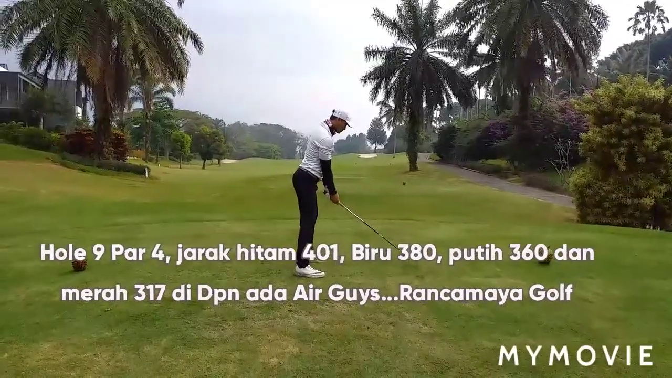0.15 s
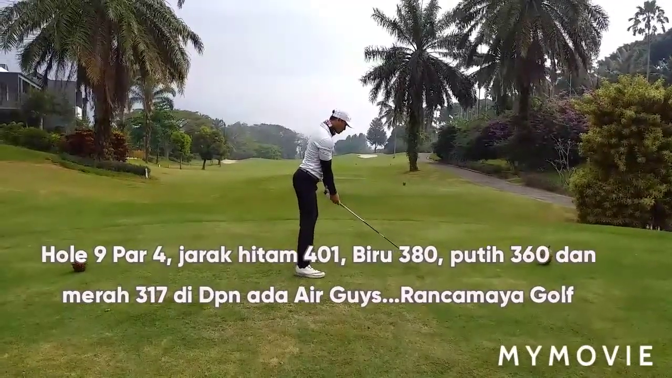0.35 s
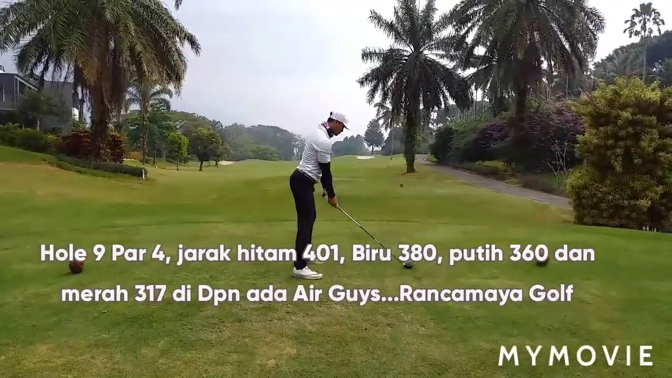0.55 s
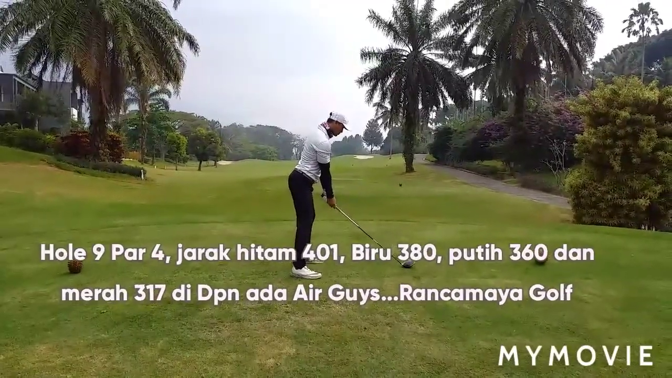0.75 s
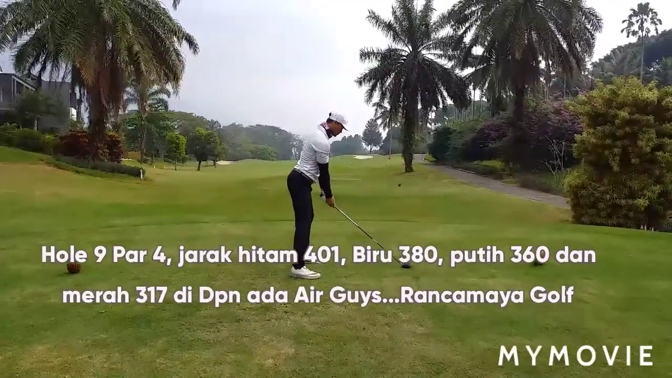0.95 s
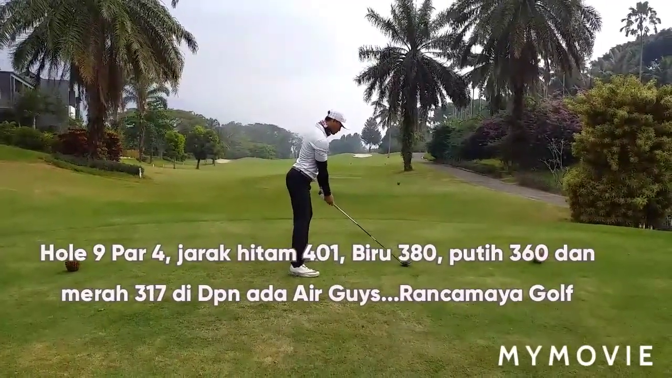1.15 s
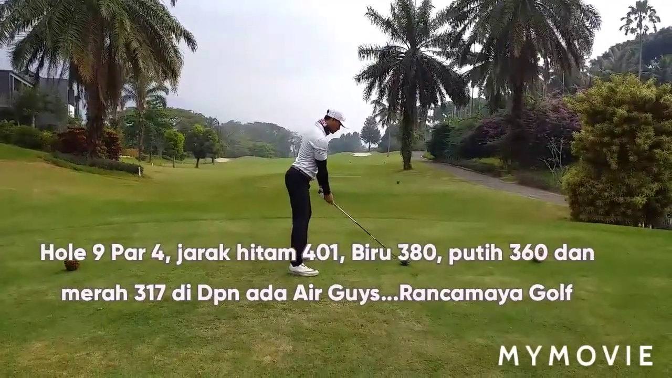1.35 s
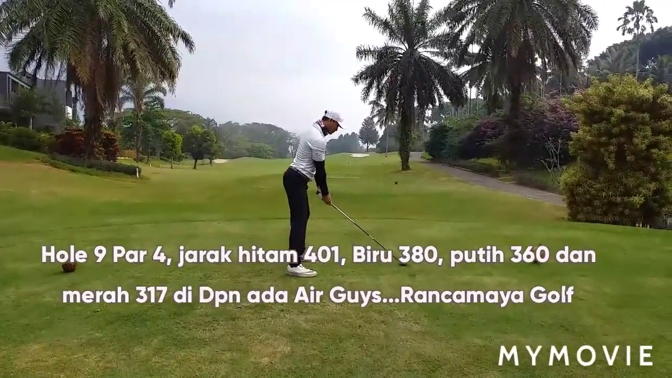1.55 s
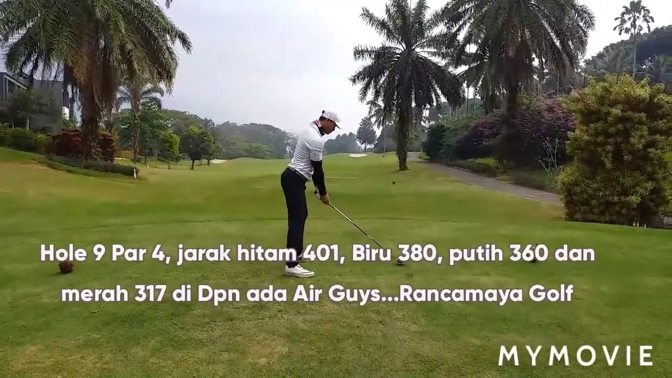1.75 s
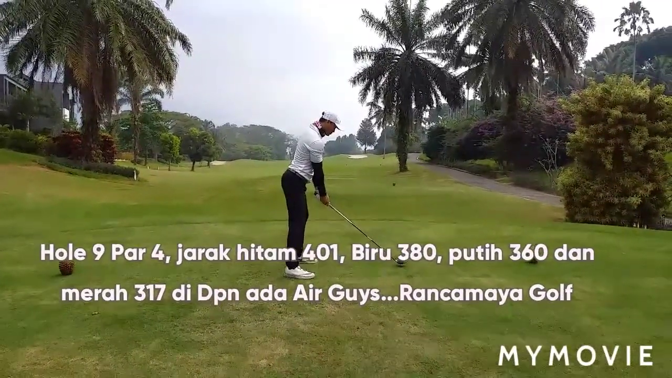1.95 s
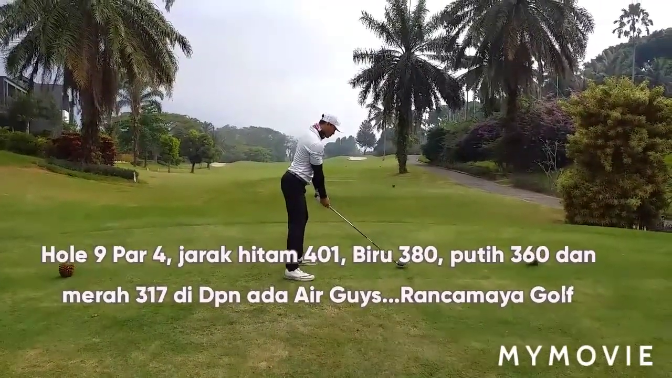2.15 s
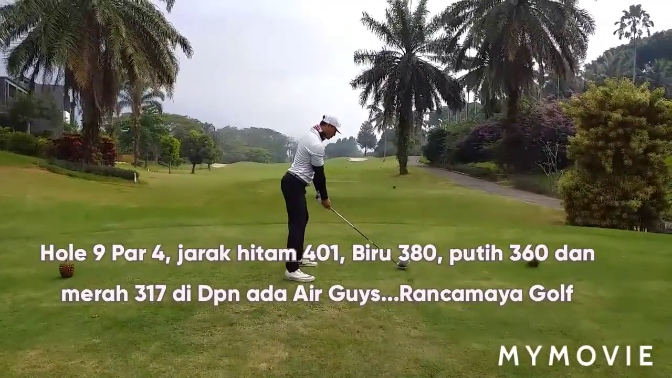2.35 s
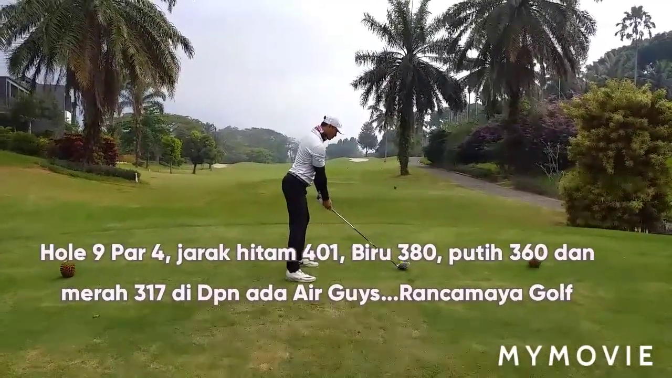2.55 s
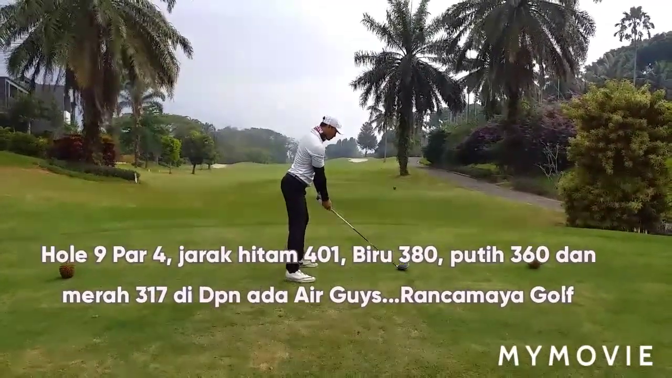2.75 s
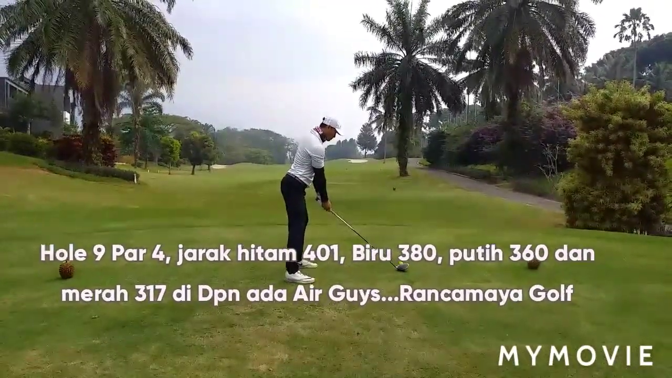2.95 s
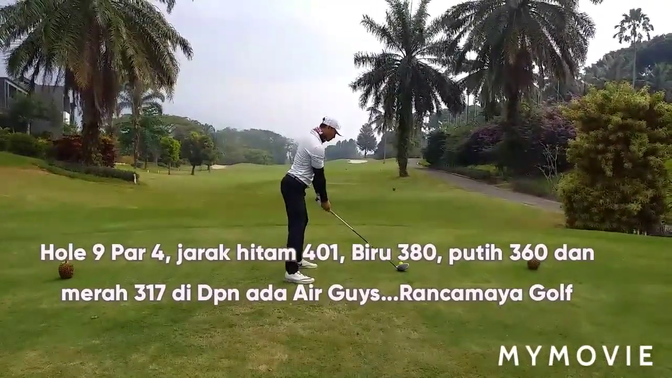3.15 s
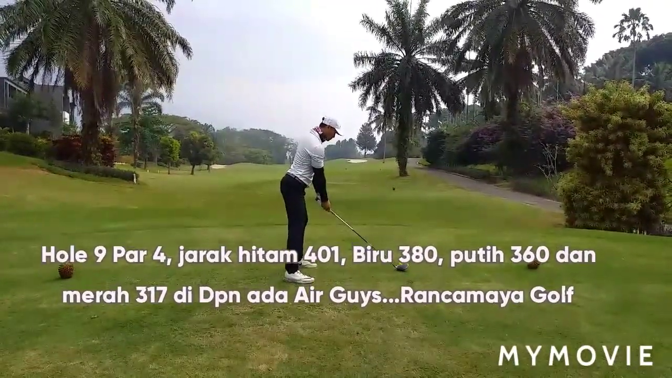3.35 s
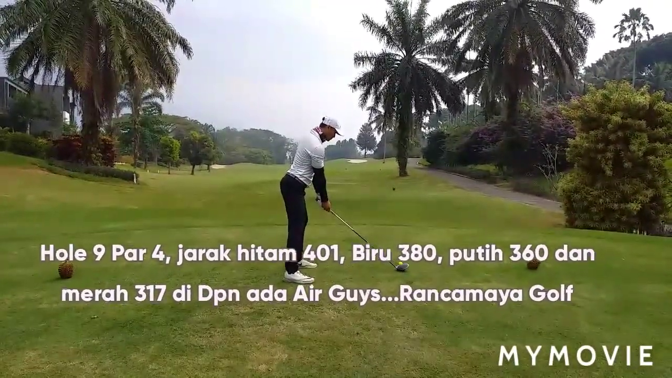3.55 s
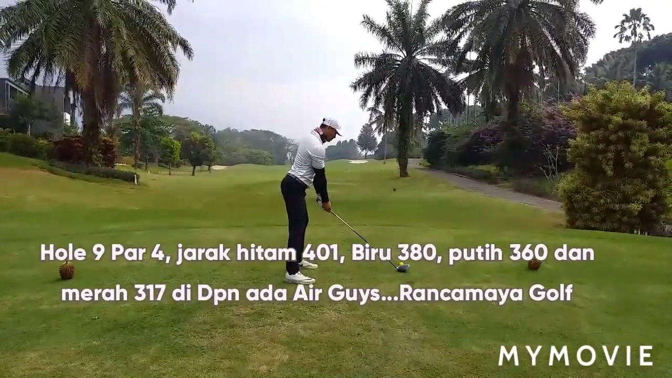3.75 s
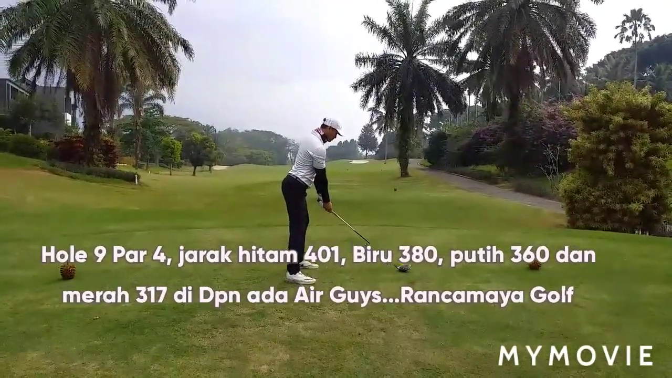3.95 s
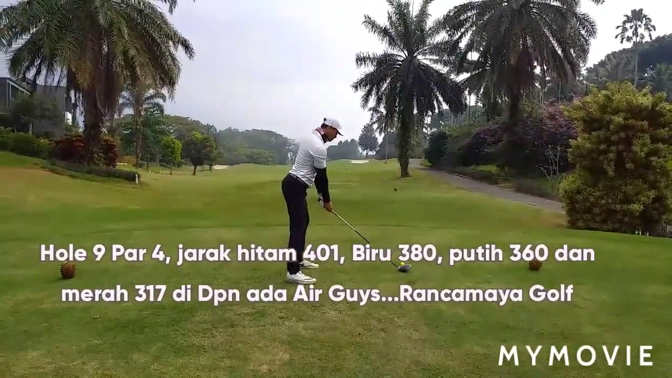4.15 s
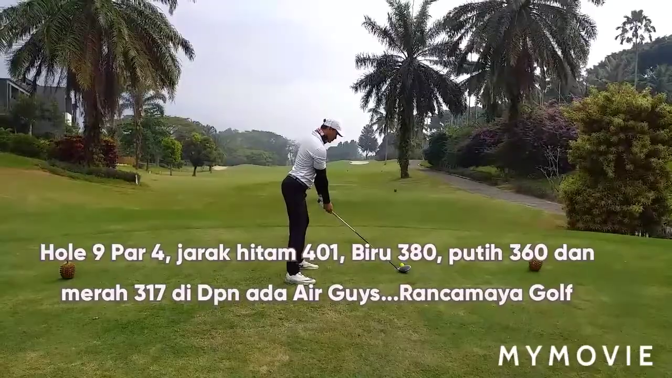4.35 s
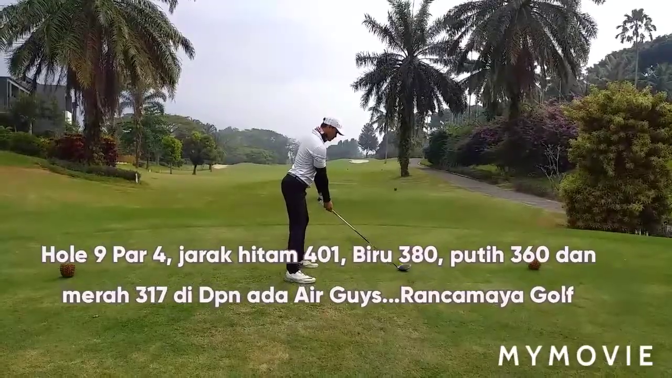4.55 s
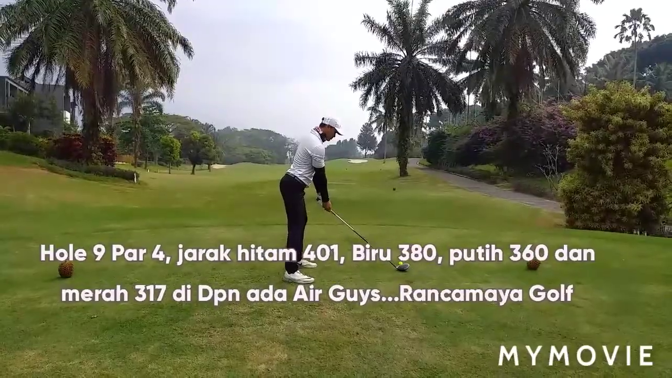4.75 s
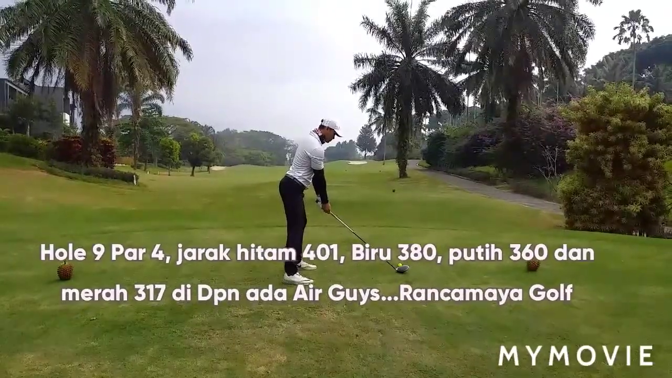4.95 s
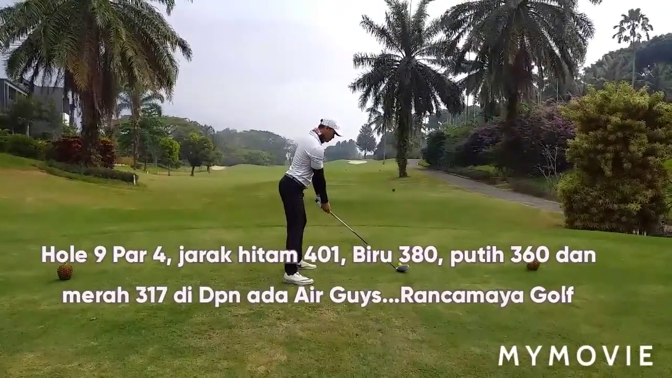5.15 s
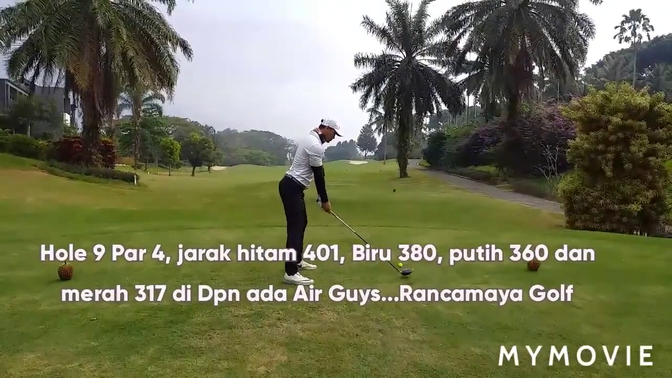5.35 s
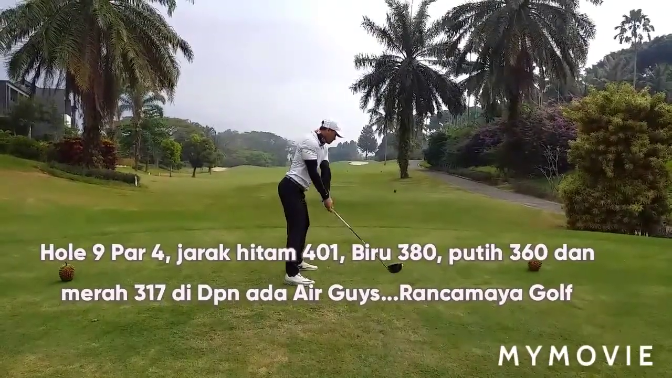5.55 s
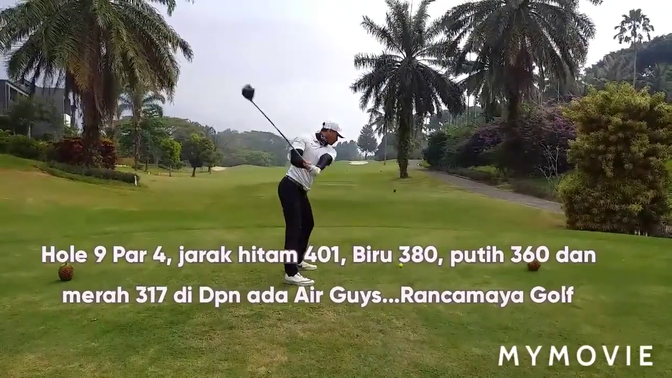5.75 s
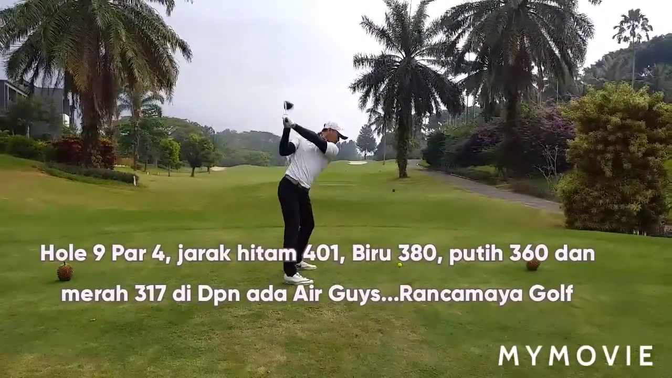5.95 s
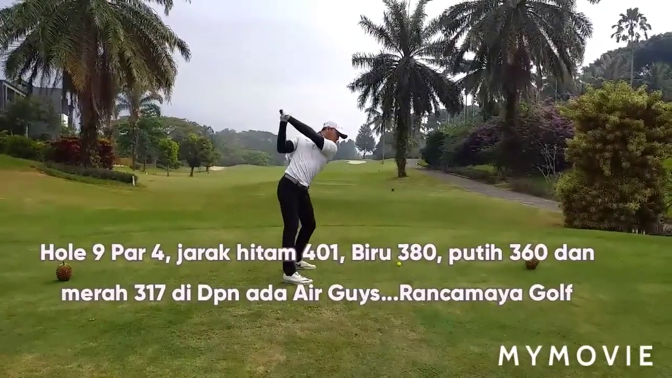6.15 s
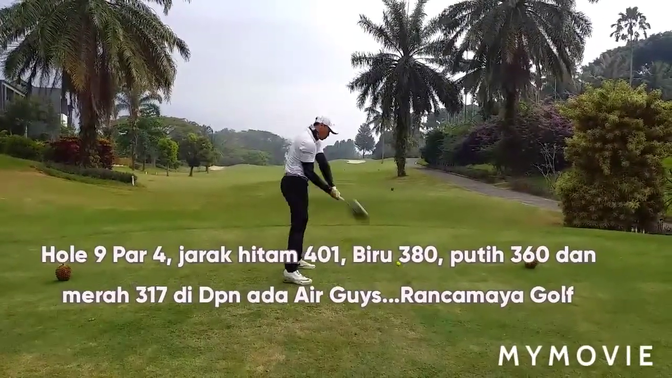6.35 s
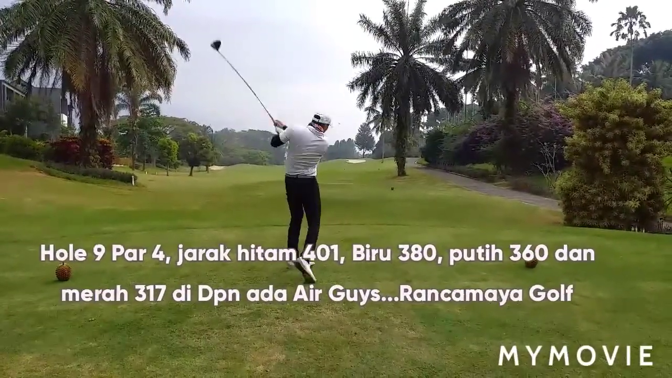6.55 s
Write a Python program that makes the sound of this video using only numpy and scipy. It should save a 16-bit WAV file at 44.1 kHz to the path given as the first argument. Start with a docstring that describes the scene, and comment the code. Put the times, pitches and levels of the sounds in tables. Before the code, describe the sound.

From 0 s a very quiet open golf course is heard in mono: soft low rumble, far traffic, leafy hiss and a shimmering insect chorus, with a bush cricket buzzing continuously very high. A distant engine throbs faintly, bogging down around 2.7-3.8 s, recovering with a slight drone near 4.8 s, then slowing again. A small bird gives a thin whistle at 0.8 s, more from 2.3 s onward, with short rising chips at 3.3 and 3.5 s; a farther bird lisps softly around 2.1-2.6 s. Tiny dry ticks cluster at 2.74 s, with fainter ones at 3.6 and 3.7 s. Whistles continue until about 6.1 s. Just before 6.4 s the club swishes briefly, then at 6.44 s a very loud, hard metallic crack bursts out, with hollow high ringing, a small low thud and quick splashing echoes from palms, cut off soon after at the end.

```python
"""A hard metallic crack rings out and splashes back from palms, on a quiet golf tee where a distant engine
drones, a bush cricket buzzes, small birds whistle and a few faint ticks sound.
Shaped noise makes the air, leaves, swish and crack; decaying sines make the hollow club head; noise in
resonances makes its echoes; harmonics of a firing rate make the engine; gliding sines make cricket and birds."""
import sys
import numpy as np
from scipy import signal
from scipy.fft import rfft, irfft, next_fast_len
from scipy.io import wavfile
from scipy.ndimage import map_coordinates

SR = 44100
rng = np.random.default_rng(int(sys.argv[2]) if len(sys.argv) > 2 else 0)


def dump(signal):
    """Clip the signal to [-1, 1] and save it as 16-bit WAV at the path in sys.argv[1]."""
    limited = np.clip(np.atleast_2d(signal).T, -1, 1)
    pcm = np.round(limited * 32767).astype(np.int16)
    wavfile.write(sys.argv[1], SR, pcm)


N = 290988
IMPACT = 6.4382  # s, when the club head meets the ball


def amp(db):
    """Logarithmic level: decibels to gain."""
    return 10 ** (np.asarray(db) / 20)


def unit(x):
    """Normalisation: scale to rms 1."""
    return x / np.sqrt(np.mean(x ** 2) + 1e-20)


def clock():
    """Sampling: the time of every sample in seconds."""
    return np.arange(N) / SR


def curves(rows):
    """Linear interpolation: one value per sample for each column after the time."""
    seconds, *columns = np.transpose(rows)
    return [np.interp(clock(), seconds, column) for column in columns]


def wobble(rate):
    """Slow random modulation: a smooth curve through random knots, rate of them a second."""
    knots = rng.standard_normal(int(N * rate / SR) + 4)
    return map_coordinates(knots, [clock() * rate])


def filtered(x, response):
    """Linear filtering: the spectrum of x times a response of frequency."""
    m = next_fast_len(N + SR // 2)
    return irfft(rfft(x, m) * response(np.fft.rfftfreq(m, 1 / SR)), m)[:N]


def noise(spectrum):
    """Spectral shaping: noise of rms 1 coloured by (Hz, relative dB per Hz) points."""
    f, db = np.transpose(spectrum)

    def colour(hz):
        return amp(np.interp(np.log(hz + 1), np.log(f), db))

    return unit(filtered(rng.standard_normal(N), colour))


def resonant(peaks):
    """Forced resonance: noise of rms 1 ringing in (Hz, width Hz, relative dB) resonators."""
    lowest, highest = peaks[0][0], peaks[-1][0]

    def response(f):
        body = sum(amp(db) * 1j * f * w / (c * c - f * f + 1j * f * w) for c, w, db in peaks)
        # steep skirts keep the sound between the outer resonances
        low_skirt = 1 + (.8 * lowest / (f + 1)) ** 12
        high_skirt = 1 + (f / highest / 1.3) ** 12
        return body / low_skirt / high_skirt

    return unit(filtered(rng.standard_normal(N), response))


def fade(start, t60, attack):
    """Exponential decay: a quick rise at start, then a fall of 60 dB in t60 seconds."""
    t = np.maximum(clock() - start, 0)
    return (1 - np.exp(-t / attack)) * np.exp(-np.log(1000) * t / t60)


# Spectra of the steady noises. Each row: frequency in Hz, relative level in dB per Hz.
RUMBLE_SPECTRUM = [(25, -39), (42, -12), (65, -3.5), (80, 0.5), (130, 0), (230, -8), (400, -16.5),
                   (900, -64)]
TRAFFIC_SPECTRUM = [(100, -28), (300, 1.5), (500, 0.5), (660, 2), (800, -2), (1150, -3), (1400, -4),
                    (1800, -10), (3000, -20.5), (8000, -52)]
LEAVES_SPECTRUM = [(900, -11), (1900, 2.5), (2500, 4.5), (3100, 5), (3800, 6.5), (5400, 2), (6200, -1.5),
                   (7600, -2.5), (8600, -13.5), (11400, -12.5), (11800, -34), (16000, -23)]
CHORUS_SPECTRUM = [(3000, -36), (4000, -14), (4400, -3), (4750, -1.5), (5200, -8), (6000, -25), (9000, -62)]
# Slow course of far traffic and insect chorus. Each row: time in seconds, level in dB before trims.
TRAFFIC_COURSE = [(0.0, -66), (0.19, -61.5), (0.47, -64.5), (2.56, -60.5), (2.6, -65), (3.03, -64.5),
                  (3.49, -70.5), (3.67, -61.5), (3.72, -67.5), (4.7, -61), (5.51, -68), (6.3, -71.5)]
CHORUS_COURSE = [(0.05, -64.5), (1.72, -60.5), (2.47, -60.5), (2.87, -66), (3.97, -70.5), (4.44, -68),
                 (4.72, -65.5), (4.87, -65), (5.26, -72.5), (5.73, -74.5), (6.3, -71.5)]


def background(leaves_db=-63, leaves_follow=0.47):
    """Incoherent addition: rumble, far traffic, leaves, insect chorus and microphone hiss are separate noises."""
    traffic_db, chorus_db = curves(TRAFFIC_COURSE)[0], curves(CHORUS_COURSE)[0]
    chorus_swing = chorus_db - chorus_db.mean()
    rumble = amp(-58.5 + 1.53 * wobble(7.4)) * noise(RUMBLE_SPECTRUM)
    traffic = amp(traffic_db + 3.5 + 0.69 * wobble(6.1)) * noise(TRAFFIC_SPECTRUM)
    # the leaves swell and sink with the chorus, in dB per dB
    leaves = amp(leaves_db + leaves_follow * chorus_swing + 0.99 * wobble(6.6)) * noise(LEAVES_SPECTRUM)
    chorus = amp(chorus_db + 0.31 * chorus_swing + 0.77 * wobble(30)) * noise(CHORUS_SPECTRUM)
    hiss = amp(-78.0) * rng.standard_normal(N)
    return rumble + traffic + leaves + chorus + hiss


# Course of the distant engine, slowing when loaded. Each row: time in seconds, firing rate in Hz,
# load from 0 to 1, throb level in dB added to its orders, drone level in dB added to its orders.
ENGINE_COURSE = [(0, 44.07, 0.05, -6.5, -86), (1.6, 44.1, 0.04, 2, -75), (2.63, 43.53, 0.05, 1, -76),
                 (2.7, 41.5, 0.88, 1, -84), (3.1, 35.9, 1, 0.5, -74.5), (3.84, 31.75, .75, 1, -74),
                 (4.3, 38.28, 0.7, -2, -64), (4.85, 41.42, .25, 2.5, -60.5), (5.2, 40.1, 0.54, -1, -63),
                 (5.56, 33.84, 0.71, 0.5, -71), (6.3, 30.86, 0.52, -2.5, -88)]
# Orders of the low throb. Each row: multiple of the firing rate, level in dB running free,
# change in dB at full load.
THROB_ORDERS = [(2, -60.5, -6.5), (3, -72.5, 15), (4, -67, 12), (5, -75.5, 12), (6, -83.5, 14)]
# Orders of the upper drone. Each row: multiple of the firing rate, relative level in dB.
DRONE_ORDERS = [(8, -4.5), (9, -8), (10, -1.5)]
# Hollow whirr. Each row: resonance in Hz, width in Hz, relative level in dB.
WHIRR_PEAKS = [(1357, 91, 1.5), (2325, 230, -4), (2564, 150, -2.5), (3720, 920, -9)]


def engine(rough_db=2.5, drift=0.028, whirr_db=-70.5, whirr_load_db=6):
    """Harmonic series: orders of the firing rate throb and drone; a faint hollow whirr grows with the load."""
    rate, load, throb_db, drone_db = curves(ENGINE_COURSE)
    # uneven firing (drift in radians) blurs the higher orders most
    phase = 2 * np.pi * np.cumsum(rate) / SR + drift * (wobble(25) + 2 * wobble(7.6))
    orders = [(k, throb_db + free_db + load_db * load) for k, free_db, load_db in THROB_ORDERS]
    orders += [(k, drone_db + db) for k, db in DRONE_ORDERS]
    tones = np.zeros(N)
    for order, db in orders:
        tones += np.sqrt(2) * amp(db + rough_db * wobble(16)) * np.cos(order * phase)
    whirr = amp(whirr_db + whirr_load_db * load + 1.3 * wobble(10)) * resonant(WHIRR_PEAKS)
    return tones + whirr


# Cricket sound scattered by foliage. Each row: frequency in Hz, relative level in dB per Hz.
CRICKET_SPECTRUM = [(8000, -64), (9100, -12), (10150, -5), (11100, -17), (12200, -58)]


def cricket(stroke_hz=106.2, centre_hz=10180, width_ms=1.6, level_db=-64.5, scatter_db=-76):
    """Frequency modulation: each wing stroke chirps downward, slowest at its loud middle; foliage fills the gaps."""
    sweep, bend = 220, 22  # Hz per ms, Hz per ms cubed
    cycle = np.cumsum(stroke_hz + .5 * wobble(23)) / SR % 1
    ms = (cycle - .5) * 1000 / stroke_hz  # from the middle of the stroke
    pitch = centre_hz - sweep * ms - bend * ms ** 3 + 110 * wobble(900)
    stroke = np.sqrt(np.sin(np.pi * cycle)) / np.cosh(ms / width_ms * 1.54)
    tone = np.sqrt(2) * np.sin(2 * np.pi * np.cumsum(pitch) / SR)
    chirps = amp(level_db + 0.63 * wobble(60)) * stroke * tone
    return chirps + amp(scatter_db) * noise(CRICKET_SPECTRUM)


# A farther bird's high notes. Each row: centre in seconds, pitch in Hz, level in dB.
LISP_NOTES = [(2.06, 7200, -69), (2.22, 7100, -66), (2.45, 6555, -65.5), (2.63, 6770, -64),
              (4.95, 6750, -71), (5.52, 7100, -77), (6.18, 6746, -75)]


def lisps(spread_s=0.076, blur_rate=1300):
    """Random amplitude modulation: foliage smears a farther bird's notes into narrow puffs of hiss."""
    t = clock()
    notes = np.zeros(N)
    for centre, hz, db in LISP_NOTES:
        puff = np.exp(-((t - centre) / spread_s) ** 2)
        notes += amp(db) * puff * np.sin(2 * np.pi * hz * t)
    return np.sqrt(2) * wobble(blur_rate) * notes


# A small bird's arched whistles. Each row: start in seconds, length in seconds, top pitch in Hz,
# final fall in Hz, level at the top in dB before flutter.
WHISTLE_NOTES = [(0.781, 0.11, 5270, 370, -63), (2.281, 0.1, 5250, 300, -63), (2.791, 0.21, 5620, 483, -65),
                 (3.36, 0.13, 5310, 655, -62), (3.75, 0.068, 4914, 200, -68), (3.96, 0.083, 5520, 350, -68),
                 (4, .08, 5125, 150, -66), (4.531, .17, 5570, 996, -62), (5.109, .12, 5330, 500, -66),
                 (5.36, 0.12, 5330, 550, -69), (5.847, .07, 5560, 549.3, -67), (5.921, .06, 5270, 900, -60),
                 (6.05, .07, 5300, 350, -69.5)]
# Its short rising chips. Each row: start in seconds, level in dB before flutter.
CHIP_NOTES = [(3.32, -57.5), (3.46, -58)]


def birds(waver_hz=55, flutter_db=3.5, trees_db=-5, trees_t60=0.34):
    """Gliding tones and reverberation: thin arched whistles and rising chips, blurred by the trees."""
    top_share, swell_db = .38, 4.5  # where the arch peaks; rise in dB from there to the end
    chip_s, chip_hz, chip_rise_hz = 0.0291, 4620, 656
    song, waver, flutter = np.zeros(N), waver_hz * wobble(70), amp(flutter_db * wobble(60))

    def add(start, pitch, db):
        """Phase integration: one gliding note with soft ends."""
        i = round(start * SR) + np.arange(len(pitch))
        ends = np.sqrt(np.abs(np.sin(np.linspace(0, np.pi, len(i)))))
        tone = np.sin(2 * np.pi * np.cumsum(pitch + waver[i]) / SR)
        song[i] += amp(db) * flutter[i] * ends * tone

    for start, length, top_hz, fall_hz, db in WHISTLE_NOTES:
        progress = np.linspace(0, 1, round(length * SR))
        past_top = (progress - top_share) / (1 - top_share)
        add(start, top_hz - fall_hz * past_top ** 2, db + swell_db * past_top)
    for start, db in CHIP_NOTES:
        add(start, chip_hz + chip_rise_hz * np.linspace(0, 1, round(chip_s * SR)), db)
    tail = fade(0, trees_t60, .01) * rng.standard_normal(N)
    return song + amp(trees_db) * signal.fftconvolve(song, tail / np.linalg.norm(tail))[:N]


# Small dry ticks. Each row: start in seconds, level in dB, 60 dB decay time in seconds.
TICK_TIMES = [(2.737, -43, 0.021), (2.74, -48, .03), (2.7475, -52, .035), (2.7607, -53, .015),
              (3.59, -50, .025), (3.728, -55.5, .03)]
# Their colour. Each row: frequency in Hz, relative level in dB per Hz.
TICK_SPECTRUM = [(900, -20), (2200, -10), (3600, 0), (6500, 2), (8200, -6), (10000, -15), (15000, -19)]


def ticks():
    """Impulsive excitation: brief bursts of noise with a faint outdoor tail."""
    level = np.zeros(N)
    for start, db, t60 in TICK_TIMES:
        tail = amp(-22) * fade(start, 0.42, 0.0038)
        level += amp(db) * (fade(start, t60, .0003) + tail)
    return noise(TICK_SPECTRUM) * level


# Ring sent forward, raised in pitch by the head's speed. Each row: resonance in Hz, width in Hz,
# relative level in dB.
FORWARD_RING = [(3812, 55, 0), (3920, 70, -8), (4090, 90, -13), (4400, 130, -13), (5125, 70, -3),
                (5250, 60, -4), (5395, 60, -4), (5750, 70, -11)]
# Crack as scattered by leaves and turf. Each row: frequency in Hz, relative level in dB per Hz.
SCATTER_SPECTRUM = [(200, -9.5), (900, -3), (1900, -12.5), (2900, -2), (3400, -2), (5000, 7), (6400, 3),
                    (8200, 3), (9200, -10.5), (10700, -0.5), (11800, -5), (15500, -9)]
# Nearest palms. Each row: delay in seconds, ring level in dB, scattered crack level in dB.
PALM_ECHOES = [(.063, -25.5, -36.5), (0.074, -40, -30.5), (.086, -34, -40), (.12, -36, -44)]


def palms(flicker_db=2.2, echo_spread_s=0.0074, grove_ring_db=-34.5, grove_scatter_db=-38.5, turf_db=-20):
    """Diffuse reflection: powers from turf, near palms and the grove behind add into a splash of ring and crack."""
    t = clock() - IMPACT
    grove = fade(IMPACT + 0.072, t60=1.24, attack=.006)
    turf = fade(IMPACT, t60=0.07, attack=.008)
    ring_power = (amp(grove_ring_db) * grove) ** 2
    scatter_power = (amp(grove_scatter_db) * grove) ** 2 + (amp(turf_db) * turf) ** 2
    for delay, ring_db, scatter_db in PALM_ECHOES:
        echo = (t > 0) / np.cosh(np.clip((t - delay) / echo_spread_s, -20, 20))
        ring_power += (amp(ring_db) * echo) ** 2
        scatter_power += (amp(scatter_db) * echo) ** 2
    splash = amp(flicker_db * wobble(700)) * noise(SCATTER_SPECTRUM)
    return np.sqrt(ring_power) * resonant(FORWARD_RING) + np.sqrt(scatter_power) * splash


# Air torn by the shaft. Each row: frequency in Hz, relative level in dB per Hz.
SWISH_SPECTRUM = [(60, -4), (220, 7), (350, -3), (800, 4), (1300, -4.5), (2000, -5.5), (3200, -2.5),
                  (4500, 4), (5800, -0.5), (7500, -6), (9000, -21), (15000, -22)]


def swish(lead=0.04, rise=0.021, fall=0.043, level_db=-40.0):
    """Aerodynamic noise: air torn by the shaft swells as the club comes down, loudest lead seconds before impact."""
    t = clock() - IMPACT + lead
    u = t / np.where(t < 0, rise, fall)
    return amp(level_db) / np.cosh(np.clip(u, -20, 20)) * noise(SWISH_SPECTRUM)


def thump(start_hz=220, end_hz=54, glide=0.0067, length=0.038, level_db=-28.0):
    """Gliding transient: a soft, low thud falls in pitch under the crack."""
    t = np.clip(clock() - IMPACT, 0, length)
    cycles = end_hz * t + (start_hz - end_hz) * glide * (1 - np.exp(-t / glide))
    envelope = (1 - np.exp(-t / 0.0012)) * (1 - (t / length) ** 2)
    return -amp(level_db) * envelope * np.sin(2 * np.pi * cycles)


# Crack of ball on face. Each row: frequency in Hz, relative level in dB per Hz.
CRACK_SPECTRUM = [(60, -14), (300, -18), (800, 0), (1200, 2), (2200, -8), (2600, 7), (3400, 3), (3900, 7),
                  (5400, 9.5), (6700, -1.5), (8000, 1.5), (9000, -16), (11000, -6), (15500, -13)]
# The ball's short knock on the face. Each row: frequency in Hz, starting level in dB before the contact
# rise, 60 dB decay time in seconds.
KNOCK_MODES = [(870, -21, 0.0088), (1570, -17, 0.011), (2123, -20, 0.018)]
# Modes of the hollow head and the beam of each that sweeps the microphone. Each row: frequency in Hz,
# starting level in dB before contact rise and turning, 60 dB decay time in seconds,
# beam centre in seconds after impact, beam width in seconds, beam level in dB.
HEAD_MODES = [(2050, -52, 0.036, 0.03, 0.016, -49), (2790, -42, 0.11, 0.023, 0.0083, -29.5),
              (2875, -33, 0.095, 0.031, 0.019, -37.5), (3743, -12, 0.076, 0.019, 0.0073, -7.5),
              (3940, -16, .04, .014, 0.0072, -32), (4340, -13.5, 0.03, 0.017, 0.0066, -33),
              (5090, -28, 0.045, 0.017, .007, -31), (5150, -10.5, 0.029, 0.013, .006, -44),
              (5330, -14.5, .035, 0.025, 0.006, -42), (5830, -27, 0.046, .014, .008, -45),
              (6060, -22, .04, .012, .007, -45), (6450, -39, .06, 0.013, 0.0073, -46),
              (7530, -23, 0.033, 0.015, 0.003, -30), (7900, -31, 0.041, .014, .006, -47),
              (10860, -36, .04, .014, .006, -48), (14300, -35, .03, .013, .004, -46)]


def strike(crack_db=-15, hold=0.0029, crack_t60=0.0089, turn=0.047):
    """Modal vibration and directivity: the struck head's modes decay, then swell as their beams pass the microphone."""
    t = np.arange(N - round(IMPACT * SR)) / SR
    # the face turns away from the microphone in the follow-through
    facing = 1 / (1 + (t / turn) ** 4)
    # the crack holds its level briefly, then decays
    crack_level = amp(crack_db - 60 * np.maximum(t - hold, 0) / crack_t60)
    sound = crack_level * noise(CRACK_SPECTRUM)[:len(t)]
    for hz, db, t60 in KNOCK_MODES:
        sound += amp(db - 60 * t / t60) * np.sin(2 * np.pi * hz * t)
    for hz, db, t60, at, width, beam_db in HEAD_MODES:
        ring = amp(db - 60 * t / t60) * facing
        beam = amp(beam_db) * np.exp(-((t - at) / width) ** 2)
        sound += (ring + beam) * np.sin(2 * np.pi * (hz * t + rng.random()))
    # the ball stays on the face for a fraction of a millisecond
    contact = 1 - np.exp(-t / 0.00017)
    return np.pad(contact * sound, (N - len(t), 0))


def scene():
    """Superposition: the quiet course and the drive add as one channel."""
    course = background() + engine() + cricket() + lisps() + birds() + ticks()
    drive = palms() + swish() + thump() + strike()
    return (course + drive)[None]


def record(dry):
    """Saturation and band limiting: the recorder rounds off the highest peaks and cuts the extreme treble."""
    top, hardness, top_hz = .68, 6, 15800  # ceiling in full scale, knee exponent, band limit in Hz
    rounded = dry[0] / (1 + np.abs(dry[0] / top) ** hardness) ** (1 / hardness)
    return filtered(rounded, lambda hz: 1 / (1 + (hz / top_hz) ** 200))[None]


dry = scene()
out = record(dry)
dump(out)
```